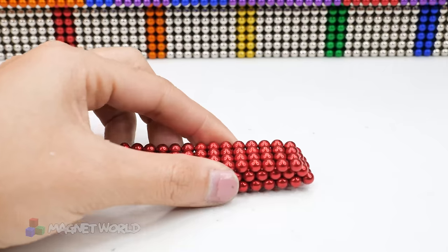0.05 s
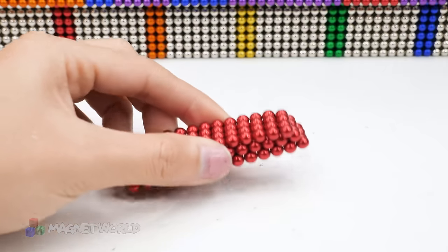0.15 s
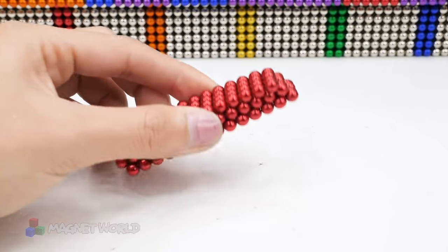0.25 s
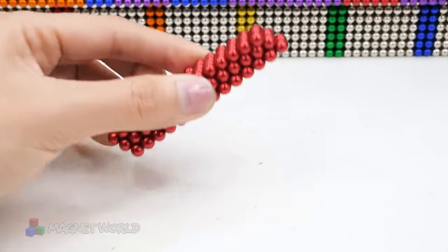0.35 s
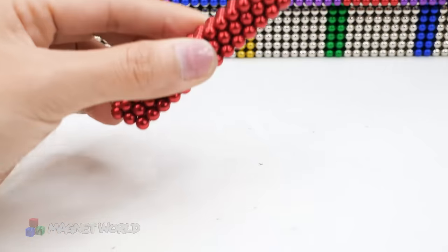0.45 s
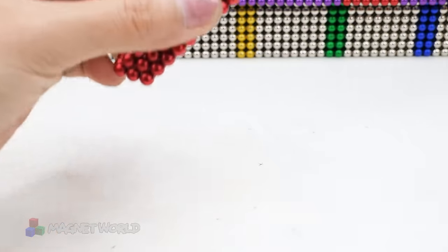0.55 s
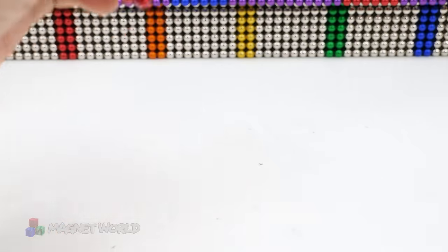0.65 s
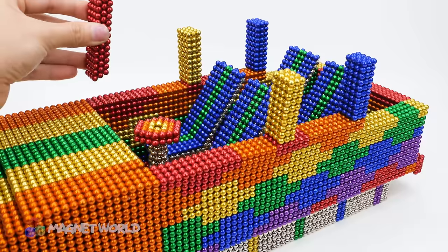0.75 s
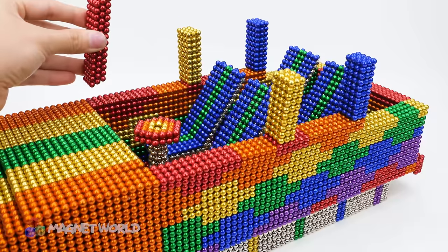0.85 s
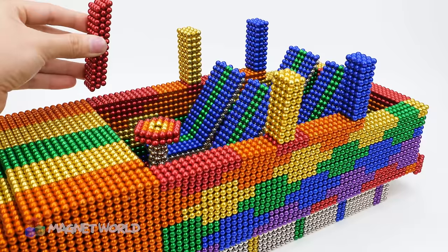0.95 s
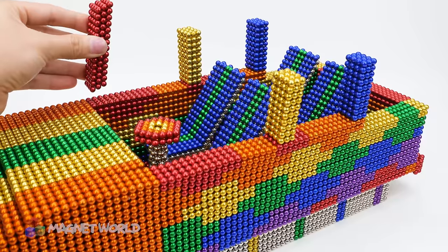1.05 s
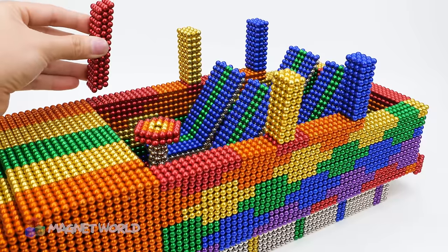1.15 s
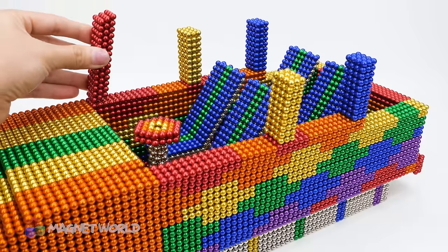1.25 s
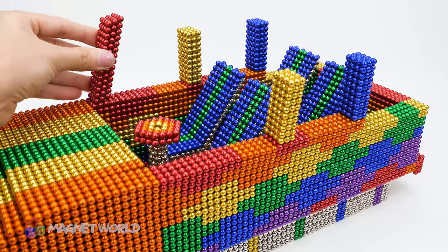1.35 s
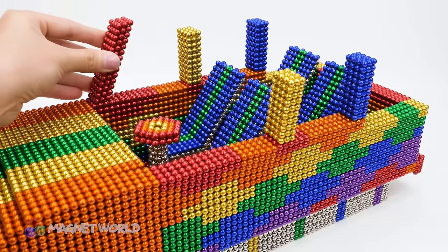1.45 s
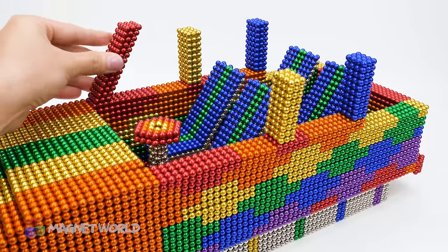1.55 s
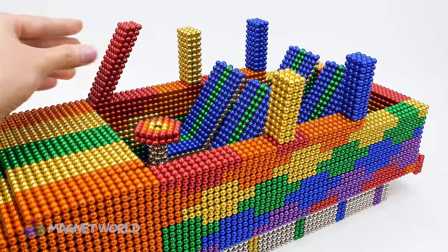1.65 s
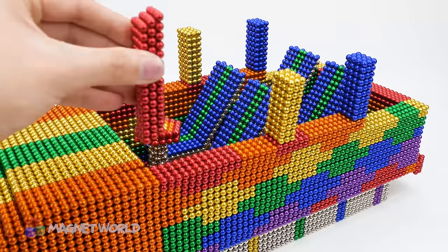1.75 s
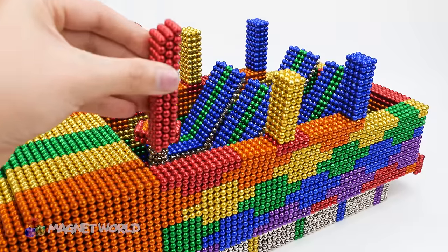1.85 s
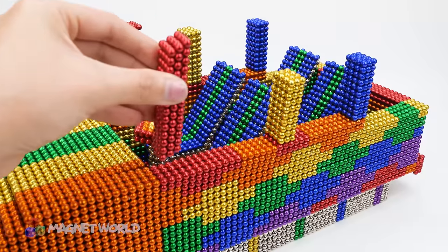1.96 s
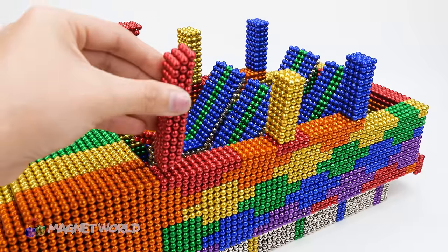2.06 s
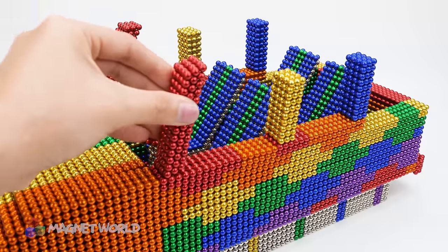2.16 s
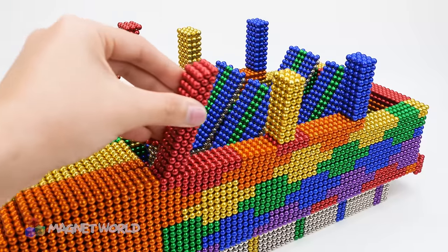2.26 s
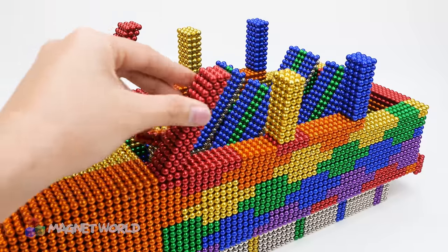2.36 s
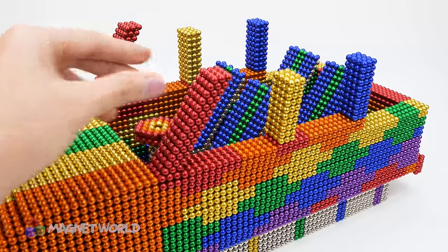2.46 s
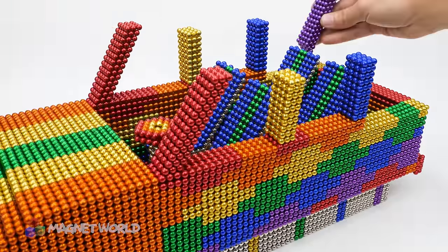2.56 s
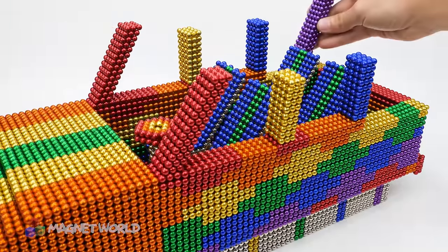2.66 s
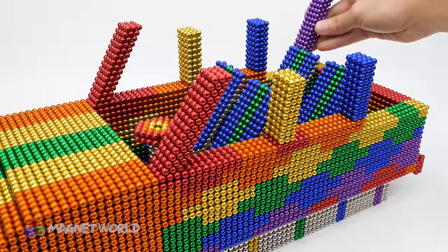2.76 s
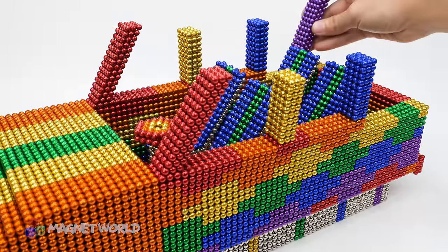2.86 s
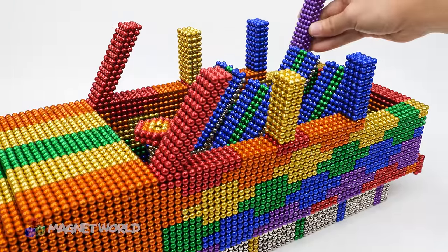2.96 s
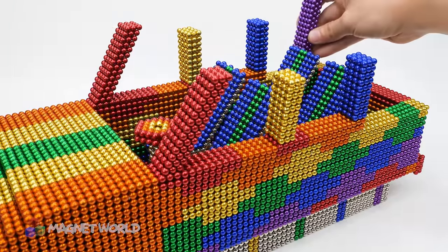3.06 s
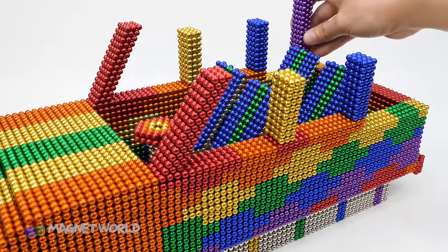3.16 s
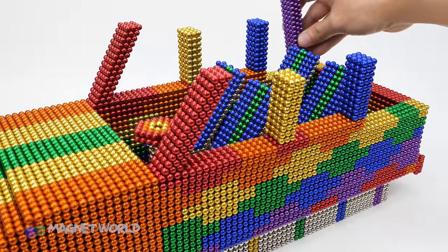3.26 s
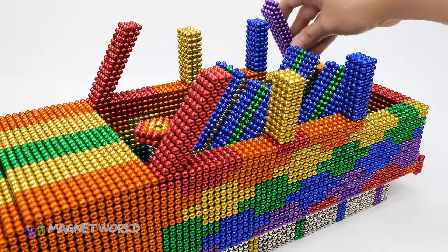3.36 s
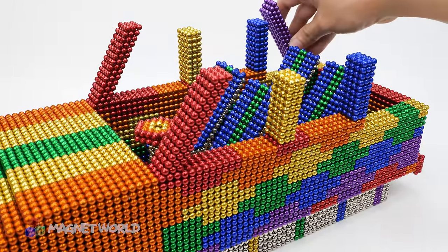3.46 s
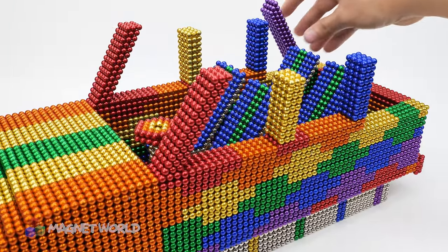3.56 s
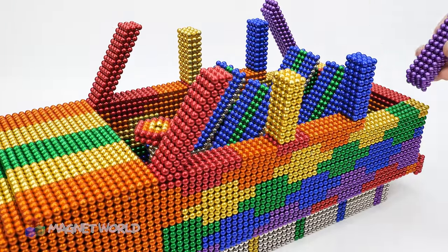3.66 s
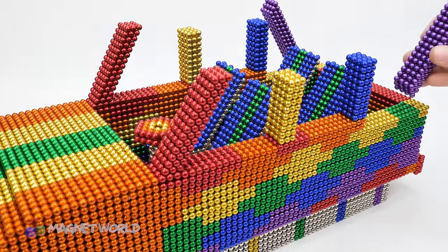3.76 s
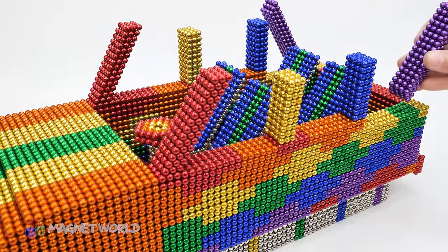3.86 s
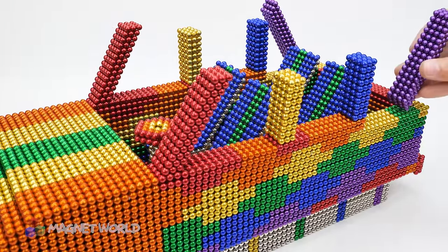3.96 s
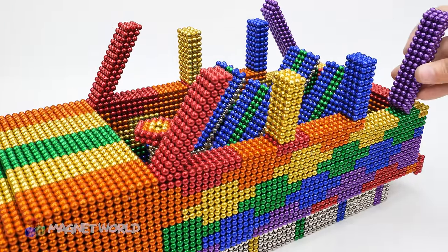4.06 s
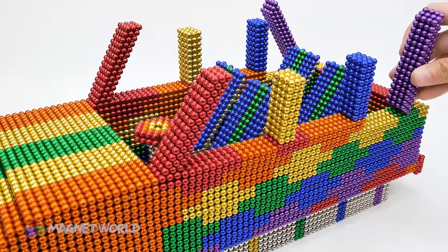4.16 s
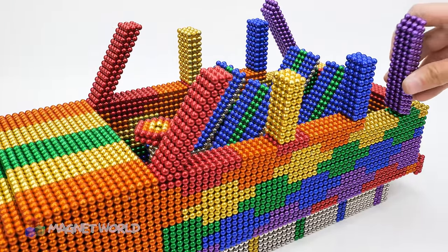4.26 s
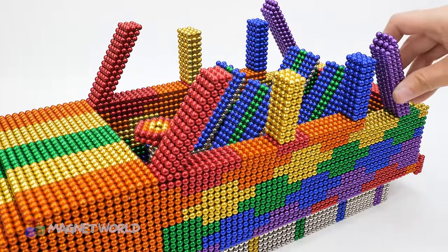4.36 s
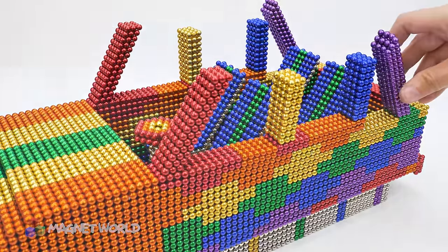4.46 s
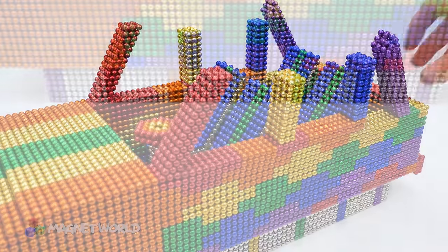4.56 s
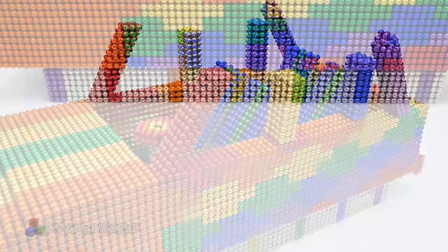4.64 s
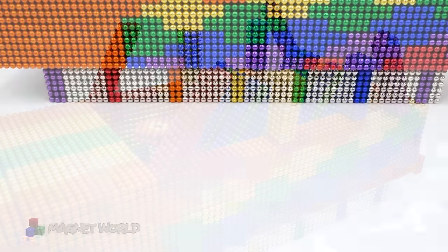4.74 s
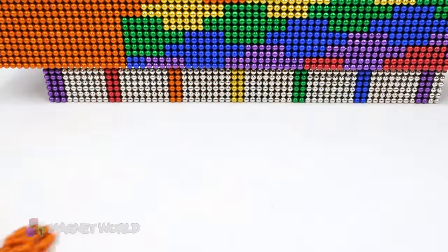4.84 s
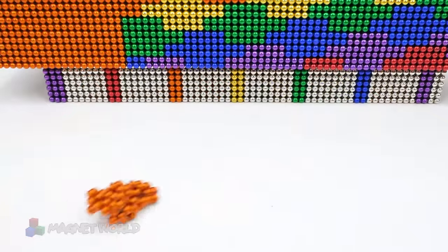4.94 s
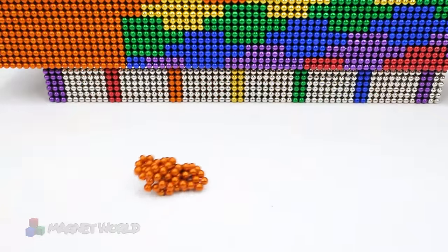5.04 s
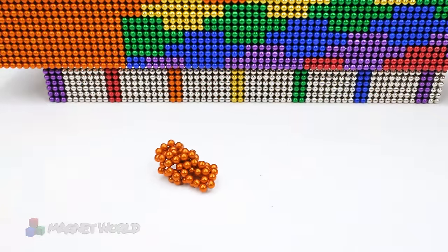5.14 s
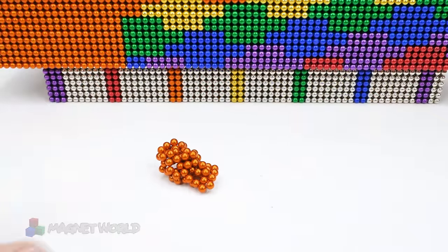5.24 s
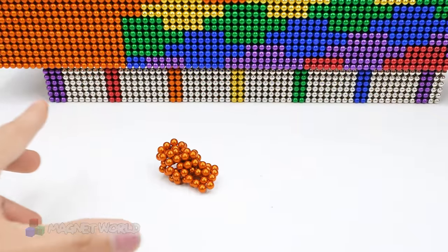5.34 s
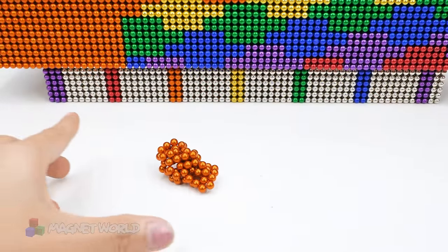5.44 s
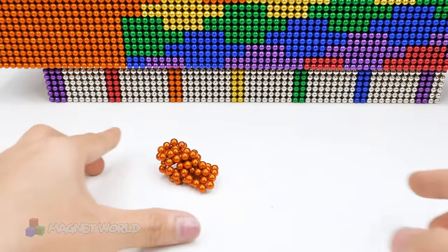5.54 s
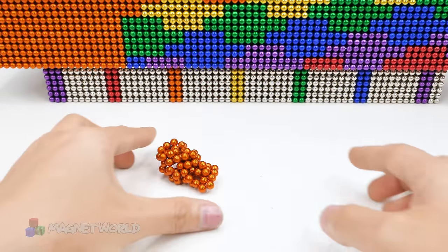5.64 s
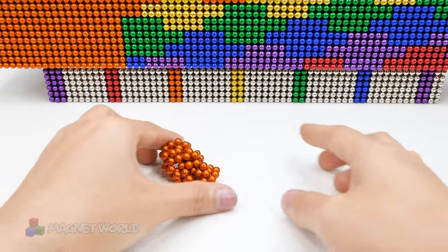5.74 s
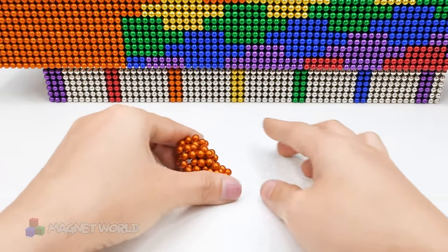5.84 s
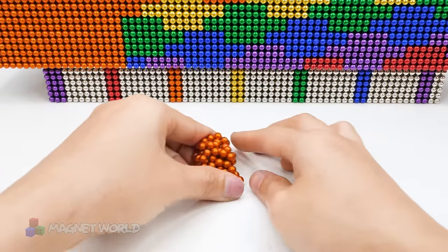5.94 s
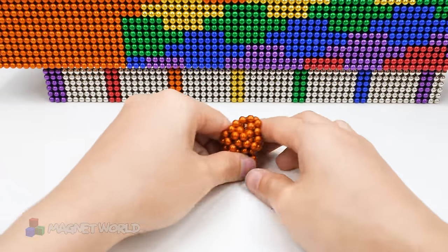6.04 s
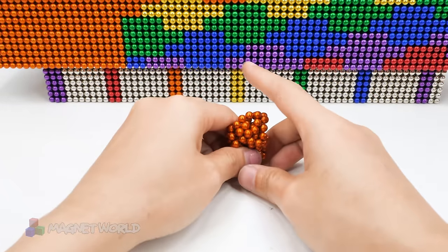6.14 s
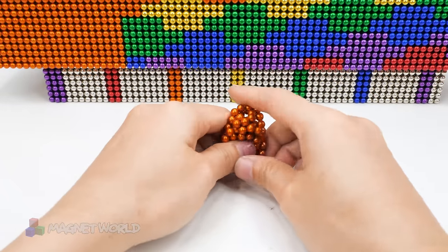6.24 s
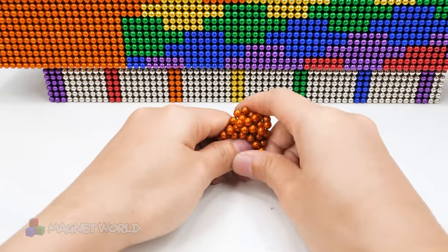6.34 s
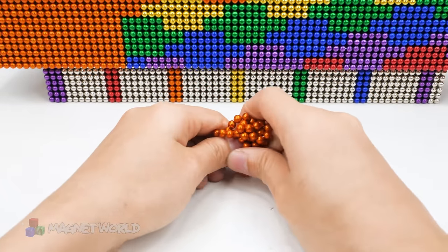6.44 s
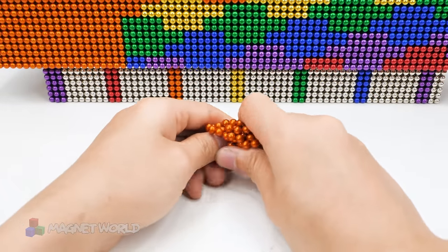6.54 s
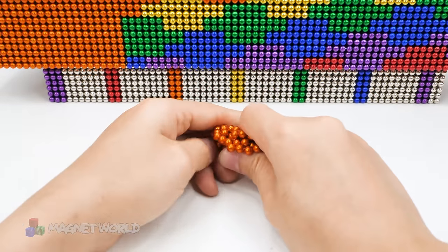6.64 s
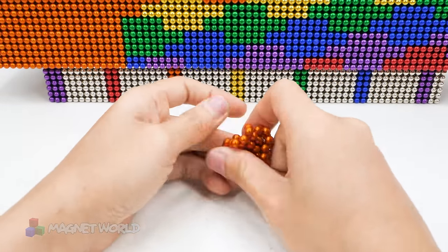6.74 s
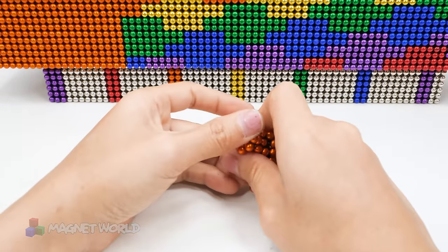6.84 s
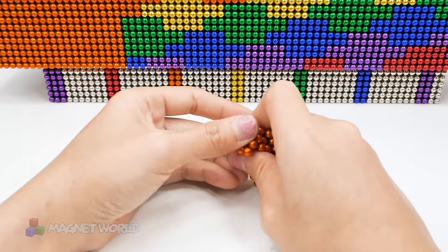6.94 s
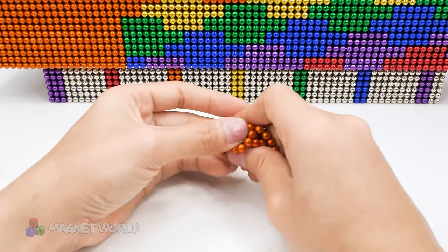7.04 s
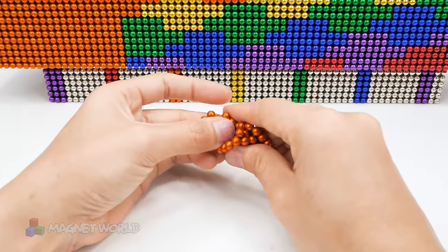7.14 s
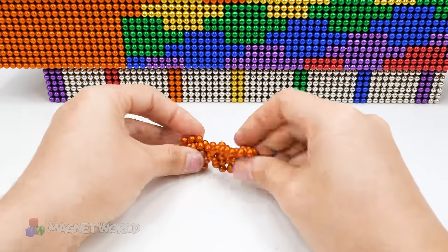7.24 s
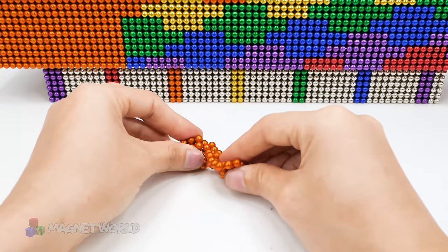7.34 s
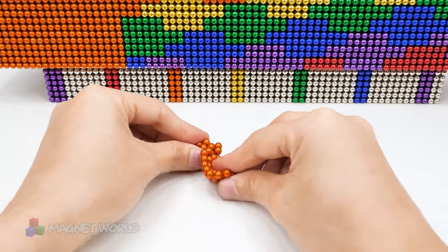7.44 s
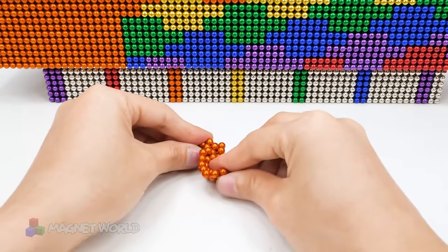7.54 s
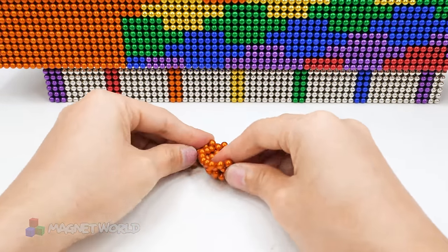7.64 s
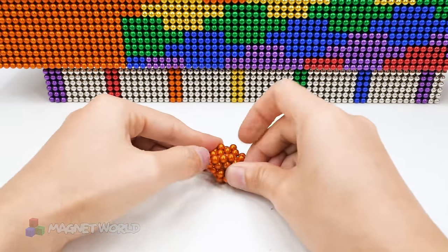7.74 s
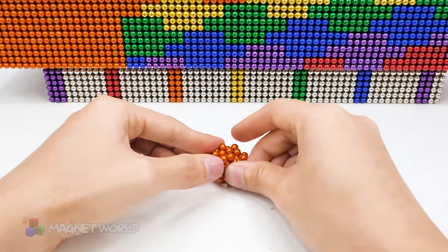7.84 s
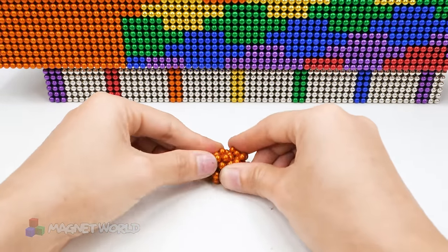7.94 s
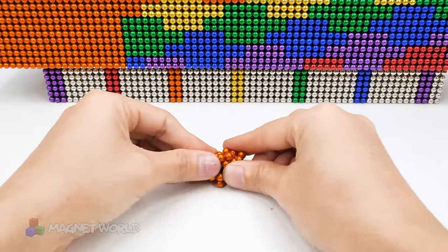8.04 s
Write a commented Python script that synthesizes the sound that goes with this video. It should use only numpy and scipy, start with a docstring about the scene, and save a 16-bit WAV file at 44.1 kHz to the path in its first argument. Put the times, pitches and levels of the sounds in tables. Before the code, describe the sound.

In a small quiet room, columns of tiny steel magnet balls are set in place with single crisp snaps and dull taps, well spaced. A lump then drops with a hard double knock and a brief rattling roll. After a pause, fingers knead it: a burst of bright snaps, then lower, heavier clacks and table knocks. Close microphone, short room tail, faint hiss.

```python
"""A small quiet room: columns and a lump of small steel magnet balls are set down, rolled and kneaded on a table.
Balls snap brightly onto each other, the lump clacks lower, the table top thuds: each blow is a quick chain
of contacts made of decaying modes. Two faint rows of ticks swell and fade; tumbling is dense random grains.
All contacts leave a short room tail, over microphone hiss and a low murmur made of coloured noise."""
import sys
import numpy as np
from scipy import signal
from scipy.fft import rfft, irfft
from scipy.io import wavfile
from scipy.ndimage import uniform_filter1d

SR = 44100
rng = np.random.default_rng(int(sys.argv[2]) if len(sys.argv) > 2 else 0)


def master(y):
    """Save y as 16-bit WAV."""
    cut = np.clip(np.atleast_2d(y).T, -1, 1)
    pcm = np.round(cut * 32767)  # scale
    wavfile.write(sys.argv[1], SR, pcm.astype(np.int16))


N = 357210
T = np.arange(N) / SR

# Event levels are taken before their layer's gain, mode pitches before random detuning.
# background noise colour, early and late: [f/Hz, relative level/dB]
EARLY_FLOOR = [(29, -91.5), (50, -60), (87, -18.5), (128, -20), (179, -12.5), (269, -7.5), (297, 2),
               (334, -9), (405, 1.5), (468, -5.5), (610, -8), (1110, -16.5), (6450, -20), (15700, -14.5)]
LATE_FLOOR = [(29, -108), (50, -58), (257, -13), (289, -0.5), (425, -10.5), (582, -10.5), (776, -18),
              (1260, -22.5), (1520, -20.5), (1720, -23.5), (15700, -30)]
# blows on the table top: [t/s, level/dB, pitch f/Hz, extra ring near that pitch/dB]
THUDS = [(0.002, -41.5, 410, 1.5), (0.413, -31.5, 620, -2), (1.354, -22, 576, 7.5), (1.368, -33, 555, 10),
         (1.584, -37.5, 647, -2), (2.201, -24, 397, -5.5), (2.406, -32, 436, 3.5), (3.048, -42.5, 702, 2),
         (3.148, -12.5, 689, 5.5), (3.416, -32.5, 736, -3), (4.074, -23, 604, -4), (4.411, -27, 589, -3.5),
         (4.863, -12, 752, 5), (4.925, -10.5, 681, 0), (5.865, -35, 337, 12), (5.984, -28.5, 584, -1),
         (6.079, -29.5, 658, 6), (6.344, -30, 391, -6.5), (7.302, -43, 630, 10), (7.375, -22.5, 670, -5.5),
         (7.52, -10.5, 840, 8.5), (7.559, -17.5, 792, 7.5), (7.708, -21, 754, 1), (7.762, -12.5, 846, 0),
         (7.849, -15.5, 866, -4.5), (7.976, -22, 702, 8), (8.049, -20.5, 850, 0)]
# table top modes: [multiple of the blow's pitch, level/dB, t60/s]
TABLE_TOP_MODES = [(0.448, -7, 0.025), (.65, -11, 0.028), (0.819, -6.5, 0.016), (1.011, -5.5, 0.029),
                   (1.299, 2, 0.0084), (1.7, -7, 0.012), (2.298, 1, 0.0069), (3.2, -3.5, 0.0072),
                   (4.498, -12, 0.008)]
# room tail by band: [f/Hz, t60/s, relative level/dB, likeness of left and right 0-1]
ROOM_BANDS = [(192, 0.38, -1.5, 0.7), (429, 0.25, 2.5, 0.7), (1217, 0.23, 1.5, 0.68),
              (2870, 0.19, -0.5, 0.55), (7300, 0.16, -2, 0.3), (14100, 0.09, 3, 0)]
# balls snapping onto balls: [t/s, level/dB, hardness/dB per octave]
SNAPS = [(0.4122, -41.5, -14), (1.3657, -38, -19), (1.581, -12, -5.5), (2.2016, -10, -0.5),
         (2.391, -9, -0.5), (3.1486, -21, -11.5), (3.4096, -14, 11), (3.4136, -13.5, -9),
         (3.4396, -25.5, -1), (4.0721, -29, -16), (4.4121, -14, -7.5), (4.4419, -22, -8),
         (4.924, -15.5, -10), (6.2343, -40.5, -12), (6.3218, -15.5, 10), (6.329, -9, -3),
         (6.3855, -28, -23), (6.399, -23.5, 0), (6.5616, -22, 1), (6.5808, -15, -3.5), (6.5966, -20.5, -8),
         (6.6037, -9, -3), (6.6209, -13.5, 13), (6.6334, -15, -4.5), (6.6681, -12.5, 11), (6.6769, -16, -6),
         (6.8094, -17, 9.5), (6.8163, -16.5, 1.5), (6.9318, -9, -1), (6.98, -13, -2), (7.003, -22, -2),
         (7.0512, -23.5, -2.5), (7.113, -36, -1), (7.1436, -17.5, 6.5), (7.1515, -10, -0.5),
         (7.1625, -10, 3), (7.232, -29, 2), (7.2587, -13, 4.5)]
# modes of snapping balls: [f/Hz, level/dB, t60/s]
SNAP_MODES = [(2410, -20, 0.002), (3290, -7.5, 0.0012), (4900, 2.5, 0.00063), (6480, -1, 0.0014),
              (8500, -6, 0.003), (11170, -12, 0.0013), (11440, -28, 0.00089), (12770, -2, 0.0012),
              (14760, -24.5, 0.003)]
# loudest tick of each faint row: [t/s]
TICK_ROW_PEAKS = [1.2378, 2.9238]
# modes of a tick: [f/Hz, level/dB, t60/s]
TICK_MODES = [(1470, -2, .012), (1650, -28, 0.028), (2260, 11, 0.0036), (3120, 1, 0.0043),
              (3820, 10, 0.0016)]
# balls tumbling, first rolled in, then gathered by the hands: [t/s, level/dB, hardness/dB per octave]
BALL_ROLLS = [
    [(4.756, -81, -15), (4.78, -28.5, -27), (4.822, -23.5, -1.5), (4.872, -28.5, -3), (4.916, -31.5, -3),
     (4.932, -24, -2), (4.996, -31, -9.5), (5.092, -33.5, -16), (5.174, -52, -13), (5.282, -93, -11)],
    [(5.63, -70, -16), (5.66, -47, -5), (5.702, -45.5, -10.5), (5.798, -55.5, -12.5), (5.981, -68.5, 4),
     (5.99, -32, -36), (6.078, -32.5, -28), (6.132, -42, -14), (6.19, -43, -14.5), (6.31, -88, -5)],
]
# their weight dragging on the table: [t/s, rumble level/dB, low roll's lift over it/dB before LOW_ROLL_SHARE]
TABLE_DRAGS = [
    [(4.82, -76, 12), (4.872, -41, -3.5), (4.916, -53, -1), (4.928, -21, -12.5), (5.036, -36, -15),
     (5.174, -41, 4.5), (5.22, -51.5, 17), (5.265, -68.5, 19), (5.31, -87, 3)],
    [(5.8, -89, 11), (5.866, -56, 9.5), (5.95, -54, -22), (6.078, -35.5, -22), (6.132, -58, -14),
     (6.206, -48, 0), (6.3, -62, 5), (6.33, -82, 9.5)],
]
# grains of the balls (scrape, clatter, fine rattle) and of the table (rumble, low roll, dry rasp):
# [f/Hz before the pitch spread, t60 in cycles of that f, contacts per second]
BALL_GRAINS = [(2302, 27, 3500), (4100, 23, 6600), (7230, 53, 7000)]
TABLE_GRAINS = [(682, 11, 740), (271.6, 33, 610), (1270, 20, 1700)]
# the lump clacking as it folds: [t/s, level/dB]
CLACKS = [(4.925, -9), (4.9536, -16), (5.9823, -25), (6.0407, -47), (6.0588, -34), (6.0706, -16.5),
          (6.1999, -28.5), (6.4978, -30), (7.3581, -31.5), (7.4386, -16.5), (7.469, -12), (7.4782, -26),
          (7.5079, -12.5), (7.5174, -12), (7.5233, -3.5), (7.5336, -5.5), (7.5582, -3.5), (7.6091, -16),
          (7.7029, -11.5), (7.714, -1.5), (7.7628, -9), (7.8114, -14.5), (7.8298, -13), (7.8428, -28),
          (7.9195, -29.5), (7.9751, -4.5), (8.0312, -9), (8.0483, -7.5), (8.079, -9.5), (8.0934, -7)]
# modes of the lump: [f/Hz, level/dB, t60/s]
CLACK_MODES = [(332.6, -32, 0.04), (848, 0.5, 0.0021), (1616, -9, 0.0073), (2110, 0, 0.0084),
               (2680, 6, 0.0023), (3550, -18.5, 0.0038), (4700, -24.5, 0.0072), (5590, -18, 0.0038),
               (7660, -15, 0.0012), (9270, -25, 0.00056)]
# fingers working the lump, small clacks: [start t/s, length/s, mean level/dB, hardness/dB per octave]
FLURRIES = [(5.993, .1, -39, -4), (6.399, 0.077, -44, 7), (6.511, .045, -38, 2), (7.998, 0.039, -30, 5)]
# what the clacks send to the room, the 2 kHz ring being heard mostly from close by: [f/Hz, level/dB]
CLACK_TO_ROOM = [(300, 4), (1300, 7), (2130, -9), (3300, 4.5), (10000, 4)]

EARLY_FLOOR_DB, LATE_FLOOR_DB = -58.5, -63.5
FLOOR_ALIKE, FLOOR_CHANGE_S = 0.6, (4.51, 4.6)
HISS_TOP_HZ, LOW_CUT_HZ, TOP_HZ = 15850, 200, 16600
# louder blows are harder: (dB per octave at level 0 dB, more per dB of level)
THUD_HARDNESS, CLACK_HARDNESS = (3.43, 0.23), (1.2, 0.19)
HARDNESS_SCATTER_DB = 2  # per octave
RING_WIDTH = 0.13  # of the extra ring, in natural log of pitch
TICK_GAP_S, TICK_DB, TICK_HARDNESS_DB = 0.0258, -47, -3
TICK_FADE_DB = 0.35  # per squared step from the loudest
ROLL_SPAN_S, ROLL_GAIN_DB = (4.7, 6.4), -7.0
RASP_DB = -0.5  # against the rumble
LOW_ROLL_SHARE = 0.85
FLURRY_GAP_S, FLURRY_SCATTER_DB = 0.015, 6
FLURRY_JITTER = 0.5  # share of the gap


def undb(db):
    """Turns dB into gain."""
    return 10 ** (np.asarray(db, float) / 20)


def unit(x):
    """Scales to rms 1."""
    return x / np.sqrt(np.mean(x ** 2))


def noise_pair(n, alike):
    """Left and right noise sharing a middle part; the rest is opposite in sign."""
    mid, side = rng.standard_normal((2, n))
    alike = np.clip(alike, 0, 1)
    opposite = np.array([[1], [-1]])
    return np.sqrt((1 + alike) / 2) * mid + np.sqrt((1 - alike) / 2) * side * opposite


def colour(x, points):
    """Shapes a spectrum by [f/Hz, level/dB] points, straight in dB over log frequency."""
    hz, db = np.transpose(points)
    n = x.shape[-1]
    f = np.maximum(np.arange(n // 2 + 1) * SR / n, 1)
    return irfft(rfft(x) * undb(np.interp(np.log(f), np.log(hz), db)), n)


def spot(db):
    """Left and right gains for a level difference; positive leans left."""
    return undb([[db / 2], [-db / 2]])


def ring(modes, scale, detune, scatter_db, hardness_db=0):
    """One contact: each mode swells over the push and dies away, uneven in strength and pitch; peak 1."""
    hz, db, t60 = np.transpose(modes)[:, :, None]
    pitch_draw, level_draw, sign_draw = rng.standard_normal((3, len(modes), 1))
    t = np.arange(int(t60.max() * SR) + 2) / SR
    f = np.clip(hz * scale * np.exp(detune * pitch_draw), 50, SR * 0.45)
    swell = (1 - np.exp(-t * f / 0.76)) ** 2
    # table modes are multiples of the blow's pitch, so hardness acts only above it
    tilt_db = hardness_db * np.log2(np.maximum(hz, 1))
    gain = np.sign(sign_draw) * undb(db + scatter_db * level_draw + tilt_db)
    decay = 1000.0 ** (-t / t60)
    y = (gain * swell * np.sin(2 * np.pi * f * t) * decay).sum(0)
    return y / np.abs(y).max()


def blows(events, modes, count, chain_s, drop_db, gain_db, pan_db,
          detune=0.087, scatter_db=3.0, lead_db=-9.5, soften=0.057):
    """A light first touch, the blow, then neighbouring balls follow, tending weaker and softer, each from its spot."""
    out = np.zeros((2, N + SR))
    for s, db, hardness_db, *pitch in events:
        hz, ring_db = pitch or (1, 0)
        # only modes near the pitch gain the extra ring
        rung = [(f, mode_db + ring_db * np.exp(-(np.log(f) / RING_WIDTH) ** 2), t60)
                for f, mode_db, t60 in modes]
        gaps = chain_s * (0.4 + 0.6 * rng.exponential(size=count))
        lags = np.r_[-chain_s, 0, np.cumsum(gaps)]
        followers_db = -drop_db * (1 + 0.4 * np.arange(count)) + 1.6 * rng.standard_normal(count)
        falls_db = np.r_[lead_db, 0, followers_db]
        spots_db = pan_db + 2 * rng.standard_normal(count + 2)
        for lag, fall_db, spot_db in zip(lags, falls_db, spots_db):
            y = ring(rung, hz, detune, scatter_db, hardness_db + soften * fall_db)
            y = y * undb(db + gain_db + fall_db)
            i = max(int((s + lag) * SR), 0)
            out[:, i:i + len(y)] += y * spot(spot_db)
    return out[:, :N]


def hardened(events, law):
    """Gives each blow a hardness that rises with its level, with some scatter."""
    top_db, slope = law
    return [(s, db, top_db + slope * db + HARDNESS_SCATTER_DB * rng.standard_normal(), *pitch)
            for s, db, *pitch in events]


def floor():
    """Hiss and murmur as coloured noise with a slight flicker; it takes a quieter colour midway."""
    fade = np.interp(T, FLOOR_CHANGE_S, (1, 0))
    step = int(SR / 9)  # a new flicker value nine times a second, smoothed
    held = np.repeat(rng.standard_normal(N // step + 1), step)[:N]
    flicker = uniform_filter1d(held, step)
    early = undb(EARLY_FLOOR_DB) * unit(colour(noise_pair(N, FLOOR_ALIKE), EARLY_FLOOR))
    late = undb(LATE_FLOOR_DB) * unit(colour(noise_pair(N, FLOOR_ALIKE), LATE_FLOOR))
    both = fade * early + np.sqrt(1 - fade ** 2) * late
    both = both * undb(0.65 * flicker + np.array([[-0.5], [0.5]]))
    return signal.sosfilt(signal.ellip(8, 0.2, 60, HISS_TOP_HZ, fs=SR, output="sos"), both)


def thuds():
    """The table top rings in modes tied to each blow's pitch; harder blows lift the upper ones."""
    return blows(hardened(THUDS, THUD_HARDNESS), TABLE_TOP_MODES, count=7, chain_s=0.0045, drop_db=4.0,
                 gain_db=-2.5, pan_db=3.5, detune=0.072, lead_db=-14.0, soften=0.44)


def room(x):
    """Dense reflections that die sooner in the treble and build up later in the bass."""
    t, tail = T[:int(0.5 * SR)], 0
    for hz, t60, db, alike in ROOM_BANDS:
        band_shape = [(hz / 2.4, -40), (hz / 1.6, 0), (hz * 1.6, 0), (hz * 2.4, -40)]
        band = unit(colour(noise_pair(len(t), alike), band_shape))
        build_up = 1 - np.exp(-t * hz / 1.43)
        decay = 1000.0 ** (-t / t60)
        tail = tail + undb(db) * band * np.sqrt(hz / 1000) * build_up * decay
    tail = tail / np.sqrt(np.sum(tail ** 2) / 2)
    return signal.oaconvolve(x[None], tail, axes=1)[:, :N]


def snaps():
    """Steel balls snap together: bright, very short modes in a tight chain of contacts."""
    return blows(SNAPS, SNAP_MODES, count=6, chain_s=0.0007, drop_db=5.0, gain_db=-1.55, pan_db=-1.5)


def ticks():
    """Rows of nine evenly spaced faint contacts, the sixth loudest."""
    events = [(s + k * TICK_GAP_S, TICK_DB - TICK_FADE_DB * k ** 2, TICK_HARDNESS_DB)
              for s in TICK_ROW_PEAKS for k in range(-5, 4)]
    return blows(events, TICK_MODES, count=2, chain_s=0.00113, drop_db=7.0,
                 gain_db=0.0, pan_db=-4.5, detune=0.027)


def patter(n, hz, cycles, per_s, spread_db=3.5, kinds=16):
    """Dense random contacts of uneven size and pitch, scattered left and right; rms 1."""
    out = 0
    for step in np.linspace(-1, 1, kinds):
        size = undb(spread_db * np.minimum(rng.exponential(size=n), 4))
        train = (rng.random(n) < per_s / kinds / SR) * size
        spot_db = 3 * rng.standard_normal() - 1
        mode = (hz * np.exp(0.474 * step), 0, cycles / hz)
        grain = ring([mode], 0.91, 0, 0) * undb(-9 * step ** 2)  # outer pitches are weaker
        out = out + signal.oaconvolve(train, grain)[:n] * spot(spot_db)
    return unit(out)


def rolling():
    """The lump tumbles over the table, many balls touching; harder contacts bring up the high grains."""
    a, b = (int(s * SR) for s in ROLL_SPAN_S)

    def follow(moves, tilt_share):
        """Gain over time, summed over the moves; silent outside them."""
        gain = 0
        for move in moves:
            s, db, tilt_db = np.transpose(move)
            gain = gain + np.interp(T[a:b], s, undb(db + tilt_share * tilt_db), 0, 0)
        return gain

    balls = 0
    for grain in BALL_GRAINS:
        octaves = np.log2(grain[0] / BALL_GRAINS[0][0])
        balls = balls + follow(BALL_ROLLS, octaves) * patter(b - a, *grain)
    rumble, low, rasp = (patter(b - a, *grain) for grain in TABLE_GRAINS)
    table = follow(TABLE_DRAGS, 0) * (rumble + undb(RASP_DB) * rasp)
    table = table + follow(TABLE_DRAGS, LOW_ROLL_SHARE) * low
    return undb(ROLL_GAIN_DB) * np.pad(balls + table, ((0, 0), (a, N - b)))


def flurries():
    """Fingers work the lump: small clacks at uneven gaps and levels within each flurry."""
    events = []
    for s, length, db, hardness_db in FLURRIES:
        for k in range(round(length / FLURRY_GAP_S)):
            onset = s + (k + FLURRY_JITTER * rng.random()) * FLURRY_GAP_S
            events.append((onset, db + FLURRY_SCATTER_DB * rng.standard_normal(), hardness_db))
    return events


def clacks():
    """The lump folds and is fingered: lower modes than the snaps, chains that fall off fast."""
    return blows(hardened(CLACKS, CLACK_HARDNESS) + flurries(), CLACK_MODES, count=4, chain_s=0.0015,
                 drop_db=9.5, gain_db=2.0, pan_db=-1.0, detune=0.034)


def scene():
    """Mixes all contacts with their room tail and lays them over the floor."""
    thud, snap, tick, roll, clack = thuds(), snaps(), ticks(), rolling(), clacks()
    to_room = snap + undb(1.0) * colour(clack, CLACK_TO_ROOM)
    to_room = to_room + undb(1.5) * thud + undb(5.0) * tick + undb(-5.5) * roll
    tail = room(to_room.mean(0)) * undb([[-0.5], [0.5]])
    contacts = snap + clack + thud + tick + roll + tail
    # the low cut keeps the contacts light in deep bass
    low_cut = signal.butter(3, LOW_CUT_HZ, "high", fs=SR, output="sos")
    return signal.sosfilt(low_cut, contacts) + floor()


def record(dry):
    """The recorder clips just below full scale, then cuts the top."""
    top_cut = signal.ellip(10, 0.2, 80, TOP_HZ, fs=SR, output="sos")
    return signal.sosfilt(top_cut, np.clip(dry, -0.97, 0.97))


dry = scene()
out = record(dry)
master(out)
```